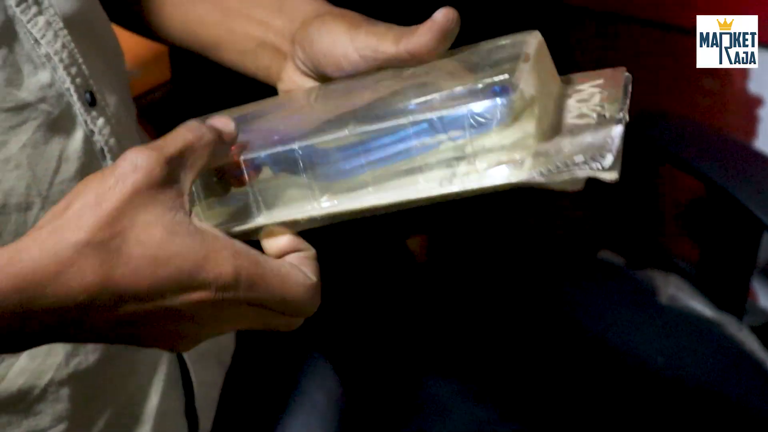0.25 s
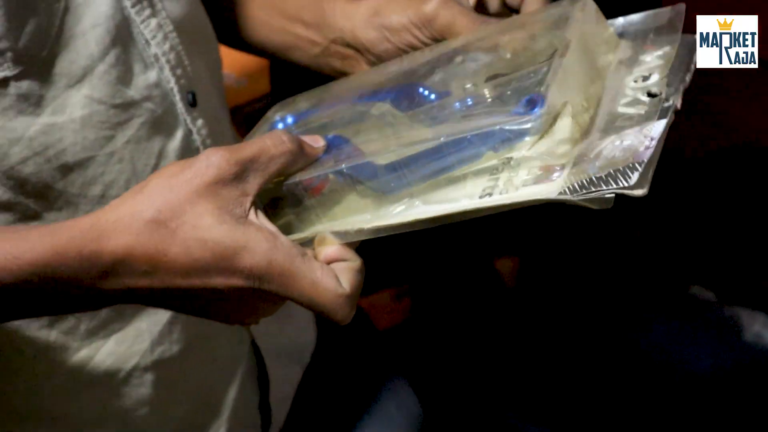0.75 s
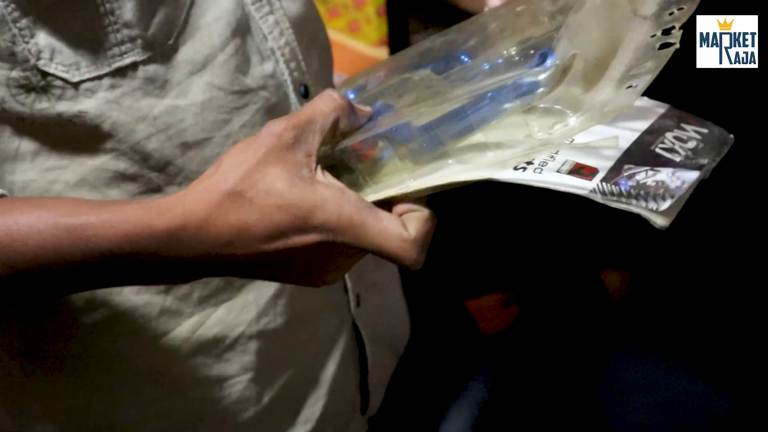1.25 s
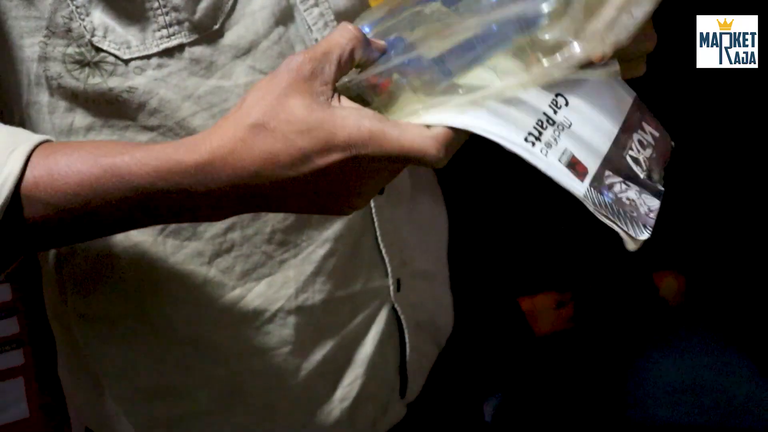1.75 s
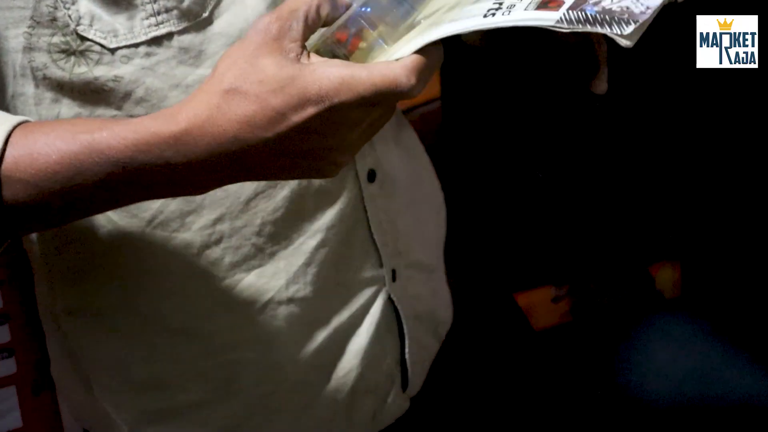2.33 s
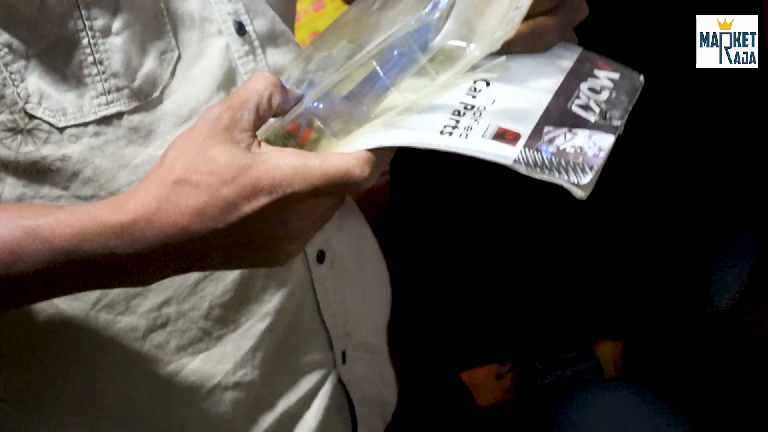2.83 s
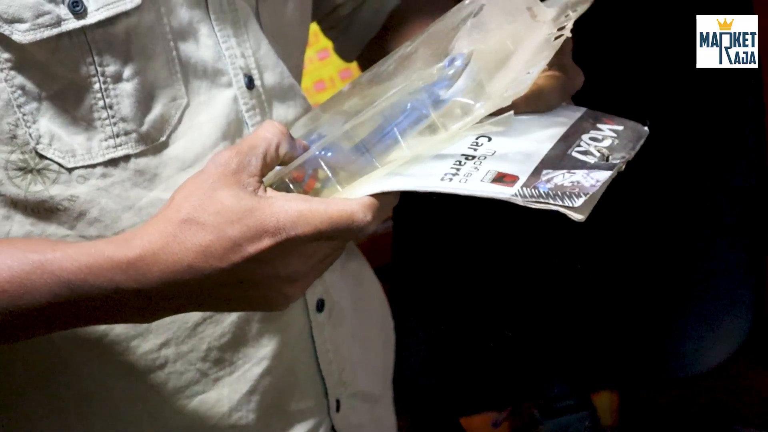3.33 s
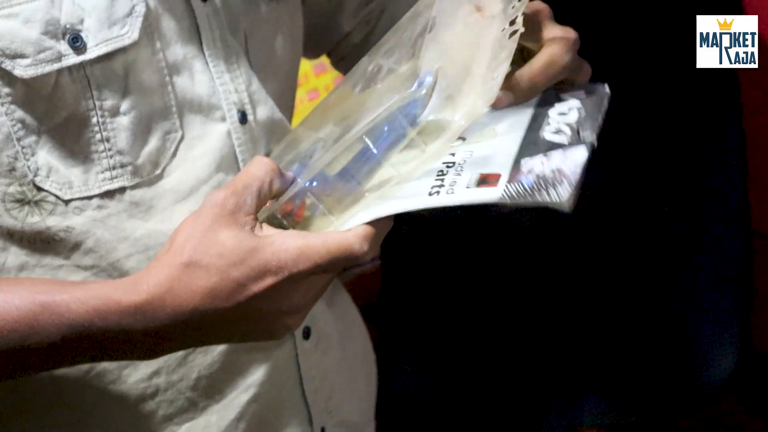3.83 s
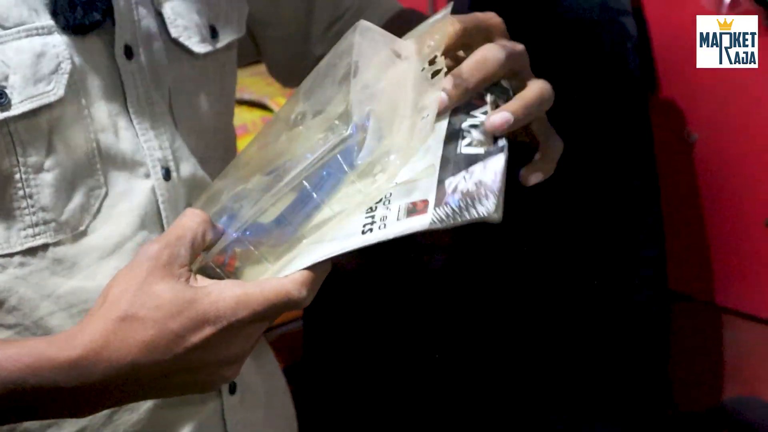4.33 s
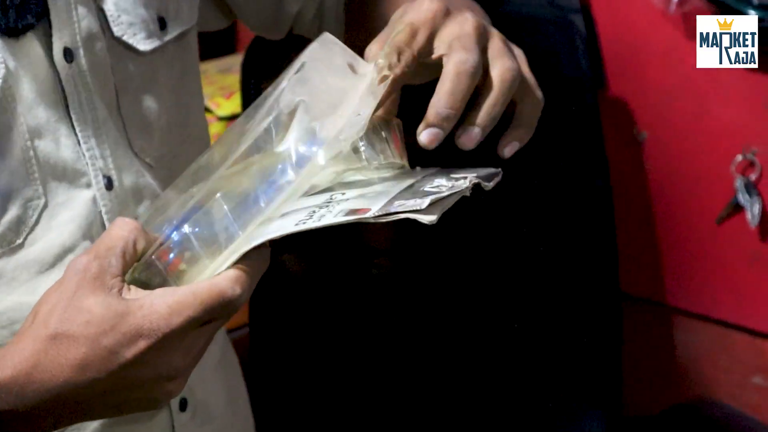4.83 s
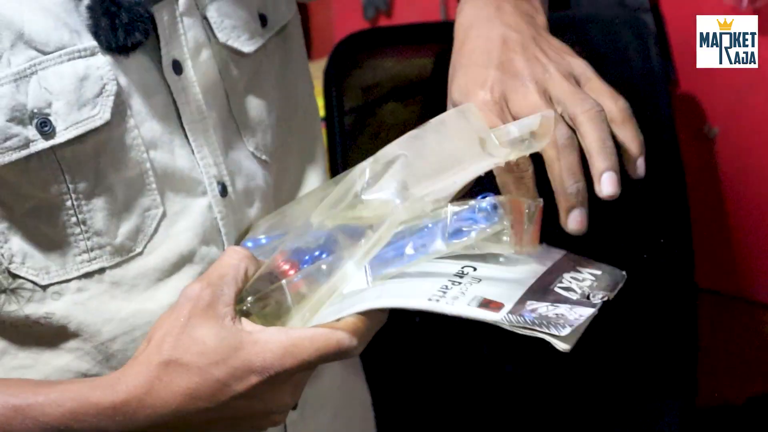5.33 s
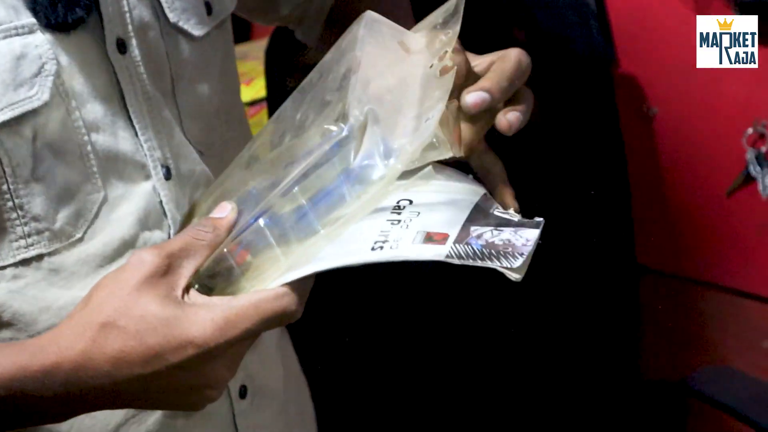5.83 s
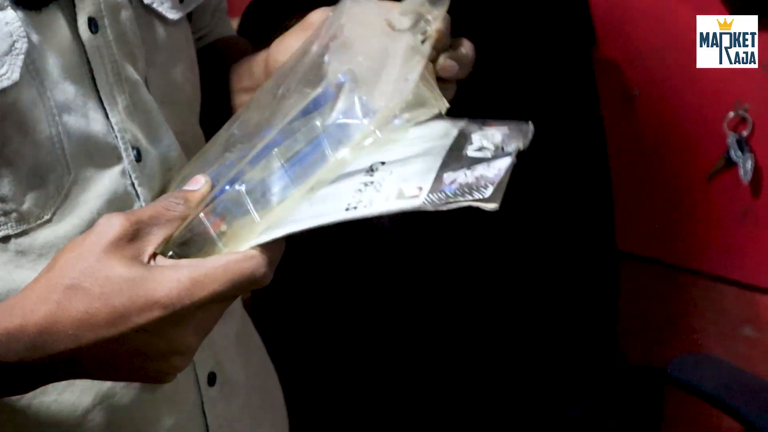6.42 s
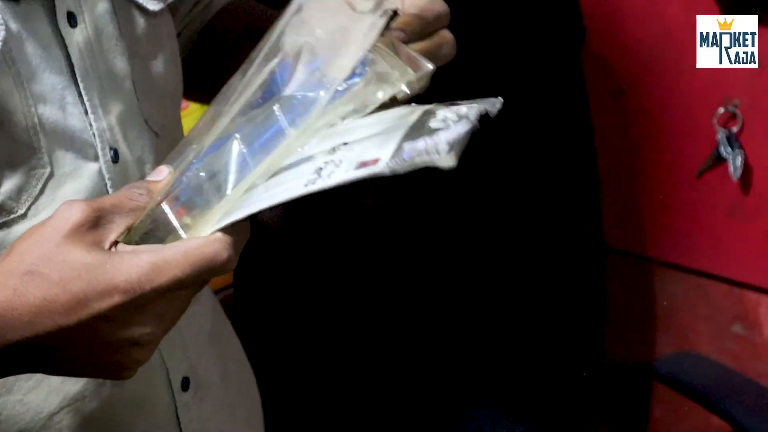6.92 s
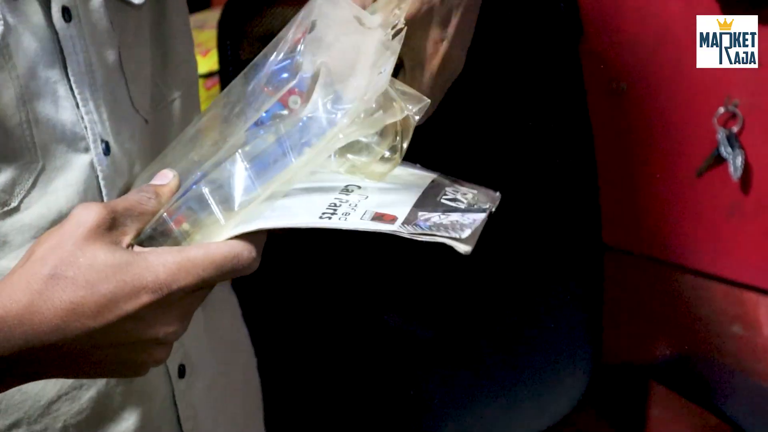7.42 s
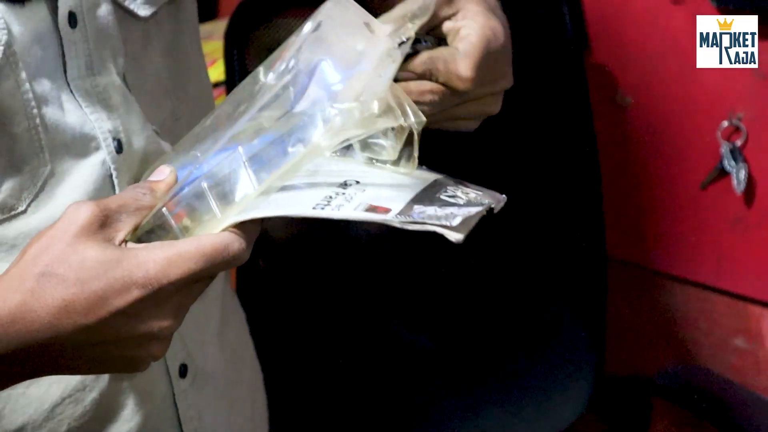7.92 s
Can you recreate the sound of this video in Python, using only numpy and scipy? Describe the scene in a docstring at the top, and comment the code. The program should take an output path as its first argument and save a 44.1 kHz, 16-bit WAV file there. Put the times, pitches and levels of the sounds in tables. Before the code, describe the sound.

A thin, rigid plastic shell is bent and pried open by hand. Creases crack one after another, some bright and tiny, some hollow mid-pitched pops, mixed with short fizzy rubs. Soft low flops of the whole pack mostly accompany the first half. The microphone is near, in a small furnished shop with short reflections and a faint low steady air sound; the crackling stops and starts irregularly to the end.

```python
"""Sharp plastic cracks, short rubbing strokes and hollow thumps, close up, over the faint air of a small shop.
Hands bend and pry open a stiff clear plastic pack on a card backing; creases snap through one by one.
Each snap mixes filtered noise bursts for crack, ringing patch and pushed air, plus a decaying sine for the patch.
Rubbing is random slips through resonances; flops of the whole shell are low sines that sag in pitch.
Close walls and shelves answer with a short echo of sparse random reflections."""
import sys
import numpy as np
from scipy import signal
from scipy.io import wavfile

SR = 44100
rng = np.random.default_rng(int(sys.argv[2]) if len(sys.argv) > 2 else 0)


def master(y):
    """Save y as 16-bit WAV."""
    cut = np.clip(np.atleast_2d(y).T, -1, 1)
    pcm = np.round(cut * 32767)  # scale
    wavfile.write(sys.argv[1], SR, pcm.astype(np.int16))


N = 359900

# creases that stand out, levels before the layer trims, settling before each layer's stretch:
# t/s, patch level/dB, patch pitch f/Hz, crack relative to patch/dB, crack tilt/(dB per octave), settling/s
CREASE_SNAPS = [(0.0653, -38, 920, -12.5, 3, 0.0059), (0.2535, -35, 1520, -5, 4, 0.0043),
                (0.2758, -33.5, 1960, -4.5, 1.5, 0.0016), (.316, -40, 1800, -8.5, 5, 0.0042),
                (0.426, -49, 1700, -18, -3, 0.0012), (0.479, -32.5, 990, -4, -8.5, 0.0095),
                (0.494, -28, 410, -13.5, 4, 0.0037), (.5602, -37.5, 776, -23, -1, 0.0063),
                (0.6202, -35, 686, -13, 2, 0.0041), (0.6554, -35.5, 2380, -10, 1.5, 0.0046),
                (0.7268, -39.5, 1190, -29, -4, 0.0061), (0.8011, -30, 1830, -2.5, 0, 0.0023),
                (0.8213, -23, 676, -12.5, 4, 0.0054), (.8642, -11.5, 810, -21, 2, 0.0027),
                (1.0795, -32.5, 432, -7.5, 2.5, 0.019), (1.2931, -26.5, 1143, -9.5, 3.5, 0.025),
                (1.3377, -14.5, 1250, -2.5, 4, 0.0026), (1.4366, -27.5, 1870, -5, 4.5, 0.0033),
                (1.470, -25.5, 1206, -4.5, 4.5, 0.01), (1.5153, -13, 870, -10.5, 3.5, 0.0017),
                (1.5279, -25, 945, 3, 1, 0.0059), (1.5469, -23, 2290, -2.5, -0.5, 0.0036),
                (1.6678, -32, 970, -6.5, 0.5, 0.0036), (1.7071, -26.5, 580, -19, 2, 0.009),
                (1.7314, -14.5, 960, -1, -.5, 0.0037), (1.912, -44, 1520, 0, 2, 0.0022),
                (1.976, -43.5, 1040, -5, 2.5, 0.0092), (2.0204, -32.5, 1840, -5, 0, 0.003),
                (2.032, -24, 1415, -15.5, -2, 0.0086), (2.1238, -18, 890, -6, -3, 0.002),
                (2.1368, -35, 920, 2.5, 3.5, 0.0043), (2.1538, -21.5, 910, -18, 9, 0.0025),
                (2.182, -32, 2480, 0, 3.5, .002), (2.2526, -31, 910, -6.5, 1.5, .0065),
                (2.2938, -24, 1370, -7, 2.5, 0.0041), (2.3139, -17, 610, -11, -2, 0.0028),
                (2.326, -21.5, 1730, -4.5, 0.5, 0.02), (2.3371, -14.5, 940, -7.5, 0.5, 0.0055),
                (2.398, -27, 880, -16, -12, 0.0048), (2.4547, -26, 873, -14.5, 1.5, 0.012),
                (2.58, -24, 886, -13.5, 1, 0.0021), (2.728, -31.5, 980, -16, -6, 0.0038),
                (2.7431, -27, 1160, -8, -16, 0.011), (2.76, -22, 990, -2.5, 2, 0.0038),
                (2.8022, -34, 540, -26, -2, .003), (2.821, -21.5, 940, -17.5, 2.5, 0.0025),
                (2.8478, -24, 1362, -5, -2.5, 0.0088), (2.8594, -22, 1700, -5.5, 0, 0.0017),
                (2.9107, -27, 580, -4, 4.5, 0.015), (2.9528, -26, 387, -10.5, -1, 0.0028),
                (3.0026, -19.5, 1690, -8.5, 1, 0.0023), (3.025, -26.5, 915, -16, 1, 0.003),
                (3.0993, -31.5, 397, -18, 5, 0.0043), (3.1521, -20.5, 1060, -7, 4, 0.0014),
                (3.1924, -37.5, 2350, 3, -3.5, 0.0016), (3.2334, -16.5, 1494, -2.5, 0, 0.005),
                (3.2442, -14.5, 2330, 2, 2.5, 0.0013), (3.4945, -35, 950, -15, -0.5, 0.0054),
                (3.7354, -25, 2420, 0.5, 6.5, 0.00089), (3.7703, -26, 650, -35, 0, 0.0024),
                (3.7875, -26.5, 2800, -1.5, -5, .0041), (3.798, -21, 447, -12, 2, 0.0029),
                (3.8325, -33, 2500, 2.5, -9, 0.0024), (3.872, -30, 650, -24, 0, 0.0022),
                (3.883, -29, 1400, -25, -12, 0.0012), (3.8927, -22, 1600, -4, 1, 0.0015),
                (3.909, -23, 328, -2.5, 3, 0.0057), (3.9481, -25, 1320, -1, -2, 0.0041),
                (3.955, -15.5, 340, -4.5, 1.5, 0.0034), (4.0185, -16, 2640, -3.5, -1, 0.0089),
                (4.1717, -36, 500, -21, 3, 0.006), (4.216, -29.5, 860, -13.5, 4, 0.0054),
                (4.2882, -30.5, 900, -18, -0.5, 0.005), (4.303, -31, 1440, -15, -15, 0.0021),
                (4.4088, -28, 910, -9.5, 1.5, .02), (4.433, -29, 1640, -4.5, -0.5, 0.003),
                (4.5388, -29.5, 1610, -10, -1.5, 0.0026), (4.6207, -20.5, 1440, -2.5, -4.5, 0.00089),
                (4.637, -24, 870, -5.5, -3, 0.0043), (4.6781, -33, 2120, -6.5, 1, 0.0062),
                (4.7552, -24, 690, -11, 3.5, .003), (4.7906, -19.5, 877, -9.5, -1, 0.014),
                (4.815, -23, 875, -2.5, 0.5, 0.002), (4.8301, -13, 870, -3.5, 1, 0.0022),
                (4.9806, -38.5, 980, -25, 6, .004), (5.0255, -33, 560, -26, 0, 0.0077),
                (5.0481, -30.5, 900, -14, 4, 0.0027), (5.0683, -31.5, 915, -12, 4, 0.0026),
                (5.2117, -25, 970, 2.5, 0, 0.00079), (5.2216, -21, 2610, 1.5, -1, 0.0022),
                (5.246, -21, 950, -24, -4, 0.0035), (5.2668, -14, 470, -7, -1, 0.0014),
                (5.3559, -19, 2580, -3, 4, 0.0037), (5.3967, -29, 930, -5, -2, .003),
                (5.4071, -29.5, 940, -2, 3, 0.0031), (5.531, -37, 1680, 2.5, 2.5, 0.012),
                (5.567, -24, 1700, -3.5, 3.5, 0.0021), (5.6086, -29.5, 2350, 6, -3, 0.0011),
                (5.6145, -32, 2460, 6.5, -2, 0.0044), (5.6398, -23, 1030, -17, -8, 0.0032),
                (5.6845, -21.5, 940, -7.5, 1.5, 0.0018), (5.7128, -13, 780, -13, 0, 0.0022),
                (5.8713, -24.5, 1690, -12.5, -11, .001), (5.904, -35, 2800, -7, 2, 0.0027),
                (6.003, -37, 910, -3, -12, 0.0017), (6.0291, -30, 1100, -2, -3.5, 0.0015),
                (6.051, -41, 1910, -1, -12, 0.0017), (6.0955, -25.5, 1800, -8, 2, 0.0026),
                (6.111, -29.5, 2500, 10, 2, 0.0013), (6.123, -18, 560, -17, 4, 0.002),
                (6.1398, -23.5, 1210, -13, -2, 0.0012), (6.2034, -38.5, 1290, -8, -12, .0011),
                (6.22, -38.5, 2960, 10.5, 2.5, .0022), (6.2746, -32, 1300, 1, 3, 0.0015),
                (6.2813, -13.5, 1020, -10.5, -5.5, .0018), (6.3211, -24, 1810, 0.5, -4.5, 0.0012),
                (6.3345, -23, 880, -11, -0.5, 0.0073), (6.372, -29.5, 830, -4, 4.5, 0.0033),
                (6.53, -43.5, 1800, -5.5, 3.5, 0.0043), (6.622, -24, 2030, -13.5, -2.5, 0.0017),
                (6.7496, -32.5, 1630, -6, 0.5, 0.007), (6.7734, -18.5, 420, -14, -9, 0.0018),
                (6.824, -26, 1600, -3.5, -4.5, .006), (7.0302, -16, 1570, -4, 2.5, 0.0032),
                (7.095, -38.5, 700, -18, -4, 0.01), (7.1363, -25.5, 2110, -9, -7, 0.0011),
                (7.149, -24.5, 1420, -2, -4.5, .0018), (7.1677, -25, 590, -3, 0.5, 0.0022),
                (7.1777, -16.5, 1020, -11.5, -2, 0.0029), (7.2101, -29, 970, 3, 0.5, 0.00053),
                (7.2477, -26.5, 1650, -3.5, 1.5, 0.011), (7.3087, -20, 2500, 1, 0.5, 0.0016),
                (7.339, -29.5, 1390, -6, -3, 0.002), (7.3474, -26, 2630, 0, 3, 0.0034),
                (7.417, -34, 437, -19, -3, 0.0025), (7.4412, -20.5, 1790, -6, -1, 0.0049),
                (7.4612, -23, 805, -1, -3, 0.021), (7.4865, -19, 830, -6, 2.5, .0035),
                (7.506, -24.5, 1300, -1.5, 0, 0.0063), (7.533, -27.5, 1220, -10, -13, 0.0011),
                (7.6226, -32, 1000, -7, -3, 0.0037), (7.635, -34, 1186, 7.5, -1, 0.0036),
                (7.747, -36, 1760, -1, -4, 0.059), (7.7806, -27, 1880, -2.5, 0.5, 0.0011),
                (7.813, -21.5, 3030, 5, -4.5, 0.00057), (7.936, -35, 420, -32, 5, .002),
                (8.0301, -31, 2070, -13, -14, 0.0015), (8.1149, -30, 1600, -.5, 0, 0.0027),
                (8.1261, -26.5, 1140, -10, 2, 0.0033)]
USUAL_HZ = 1010  # patch pitch of a usual crease


def gain_of(db):
    """Decibels to amplitude."""
    return 10 ** (np.asarray(db) / 20)


def evened(x):
    """Scales to an rms of one."""
    return x / np.sqrt(np.mean(x ** 2) + 1e-20)


def read(points, hz):
    """Reads a table on a log-frequency axis."""
    f, value = np.transpose(points)
    return np.interp(np.log(hz + 1), np.log(f + 1), value)


def add(mix, s, sound):
    """Mixes a sound in at a time in seconds."""
    part = mix[max(round(s * SR), 0):][:len(sound)]
    part += sound[:len(part)]


def colour(x, points, ring_hz=1000, ring_db=0, octaves=0.25, tilt_db=0, size=2048):
    """Causal filter with the given spectrum, an optional resonance and a tilt of the treble."""
    hz = abs(np.fft.fftfreq(size, 1 / SR))
    db = read(points, hz)
    db += ring_db / (1 + (np.log2((hz + 1) / ring_hz) / octaves) ** 2)
    db += tilt_db * np.log2(np.clip(hz, 2500, 11000))
    # minimum phase: nothing sounds ahead of the input
    spectrum = np.exp(np.conj(signal.hilbert(np.log(gain_of(db)))))
    taps = np.fft.ifft(spectrum).real
    return signal.fftconvolve(x, taps)[:len(x)]


def blow(x, db):
    """Gives a short sound the energy that this level holds over a hundredth of a second."""
    return gain_of(db) * x * np.sqrt(SR / 100 / (np.sum(x ** 2) + 1e-20))


def shop(level_db=-53):
    """Faint steady air of the shop, as coloured noise."""
    # air spectrum: f/Hz, relative level/dB
    shop_colour = [(25, -7), (55, 6), (110, -1), (200, -3), (400, 0), (850, -25), (2500, -29),
                   (7000, -31.5), (13000, -39.5), (16000, -71)]
    return gain_of(level_db) * evened(colour(rng.standard_normal(N), shop_colour))


def room(x, gap=0.004, size=8192):
    """Close walls and shelves answer within milliseconds; fresh random reflections per short grain."""
    # echo decay: f/Hz, t60/s
    echo_decay = [(100, 0.19), (300, 0.072), (900, 0.078), (2500, 0.089), (6000, 0.12), (14000, 0.12)]
    out, length = np.zeros(N), SR // 3
    # overlapping grains with new reflections each, so no fixed colour builds up
    for start in range(0, N, size // 2):
        taps = rng.standard_normal(length) * (rng.random(length) < 4000 / SR)
        taps = taps * (np.arange(length) > gap * SR)
        hz, t, z = signal.stft(taps, SR, nperseg=256)
        decay = gain_of(-60 * t / read(echo_decay, hz)[:, None])
        tail = signal.istft(z * decay, SR)[1]
        part = x[start:start + size]
        grain = part * np.hanning(size)[:len(part)]
        add(out, start / SR, signal.fftconvolve(grain, tail / np.linalg.norm(tail)))
    return out


def rubbing():
    """Strength of rub and fizz: each stroke swells and fades in an arch, and each snap jolts the sheets."""
    # strokes of the sheets sliding under the fingers, fizz before the layer trim:
    # start t/s, length/s, level/dB, edge fizz relative to the rub/dB
    strokes = [(0.17, 0.31, -47, 5.5), (.5, .2, -46.5, 2.5), (0.714, 0.39, -45, -0.5),
               (1.034, 0.18, -39, 0.5), (1.211, 0.17, -36, 0.5), (1.372, 0.25, -29, 1.5),
               (2.174, 0.35, -37.5, -3.5), (2.593, 0.13, -47.5, -15), (2.73, .36, -36, 2),
               (3.344, 0.062, -45, 6.5), (3.66, 0.49, -43.5, 2), (4.3, 0.47, -36, -2.5),
               (4.742, 0.19, -38, 9), (4.95, 0.17, -37, 1.5), (5.12, 0.25, -43, 1.5),
               (5.498, 0.25, -31.5, 3.5), (5.95, 0.22, -43.5, 0), (6.242, 0.19, -36.5, -13),
               (6.437, 0.45, -45, 2.5), (6.67, 0.16, -52.5, -7), (7.14, 0.26, -35, 4),
               (7.42, 0.14, -38.5, 7.5), (7.64, 0.42, -43, -1.5), (8.082, 0.15, -46.5, 7)]
    peak, roundness = 0.35, 0.56  # share of a stroke at its fastest; how pointed its arch is
    grip_db = -54.5  # the held sheets never lie quite still
    shift_db, shift_s = -27, 0.065  # shift relative to the snap's listed level; decay time constant
    rub, fizz, t = np.zeros(N), np.zeros(N), np.arange(SR // 2) / SR
    for start, length, db, fizz_db in strokes:
        speed = np.sin(np.pi / 2 * np.interp(t / length, [0, peak, 1], [0, 1, 0]))
        stroke = gain_of(db) * speed ** roundness
        add(rub, start, stroke ** 2)
        add(fizz, start, (gain_of(fizz_db) * stroke) ** 2)
    shift = np.full(N, gain_of(grip_db) ** 2)
    for s, db, *_ in CREASE_SNAPS:
        add(shift, s, (gain_of(db + shift_db) * np.exp(-t / shift_s)) ** 2)
    return np.sqrt(rub + shift), np.sqrt(fizz + shift)


def slips(per_s, spread_db, smooth, settle):
    """Tiny stick-slip releases of uneven size, each a short shiver, over a smooth hiss."""
    chance, size = rng.random(N), np.minimum(rng.exponential(1, N), 3)
    releases = (chance < per_s / SR) * gain_of(spread_db * size) ** 2
    power = signal.lfilter([1], [1, -np.exp(-1 / (settle * SR))], releases)
    return np.sqrt(power / power.mean() + smooth ** 2) * rng.standard_normal(N)


def sliding(level_db=0, fizz_db=-9, count=8):
    """Slips ring patches of many sizes as the sheets rub; their sharp edges fizz."""
    # spectra of the rubbed sheets and of their edges: f/Hz, relative level/dB
    rub_colour = [(40, -8), (150, 2), (450, -1.5), (950, -1), (1600, -8.5), (2400, -10.5), (4000, -32)]
    fizz_colour = [(1200, -28), (2100, 2), (2700, 8), (4000, -1.5), (7000, -8), (10000, -16), (14000, -16),
                   (16000, -51)]
    body, edges = np.zeros(N), np.zeros(N)
    for hz in np.geomspace(450, 2200, count):
        ticks = slips(per_s=45, spread_db=5.5, smooth=0.44, settle=0.0014)
        body += colour(ticks, rub_colour, ring_hz=hz, ring_db=14.0, octaves=0.14)
        edges += colour(ticks, fizz_colour, ring_hz=2.8 * hz, ring_db=11)
    rub, fizz = rubbing()
    return gain_of(level_db) * (rub * evened(body) + gain_of(fizz_db) * fizz * evened(edges))


def flops(level_db=-1, t60=0.088, rise=0.00083):
    """The lowest mode of the shell, sagging as it relaxes and damped by the hands."""
    # whole-shell flops: t/s, level before trim, rise and decay/dB, relaxed pitch f/Hz
    flop_events = [(.621, -28.5, 173), (0.867, -19, 194), (1.08, -28, 157), (1.263, -24, 160),
                   (1.336, -20, 244), (1.732, -16, 167), (2.034, -19.5, 173), (2.335, -23, 202),
                   (2.455, -16, 133), (2.757, -15.5, 166), (3.952, -20, 267), (5.712, -26, 107)]
    sag, sag_s = 0.22, 0.0064  # the bent shell starts stiffer: extra share of pitch; time to relax
    out, t = np.zeros(N), np.arange(SR // 4) / SR
    stretched = t + sag * sag_s * (1 - np.exp(-t / sag_s))
    for s, db, hz in flop_events:
        envelope = gain_of(db + level_db - 60 * t / t60) * (1 - np.exp(-t / rise))
        add(out, s, envelope * np.sin(2 * np.pi * hz * stretched))
    return out


def shiver(t, settle, kick):
    """A first jolt, then bending waves that bounce about the sheet and die, as decaying noise."""
    waves = rng.standard_normal(len(t)) * np.exp(-t / settle)
    waves /= np.linalg.norm(waves)
    waves[0] += kick * rng.choice([-1, 1])
    return waves


def crumple(t, lead, share, decay):
    """The crease creaks a few times just before it gives, and its neighbours tick as it settles."""
    chance, size = rng.random(len(t)), rng.standard_normal(len(t))
    ticks = (chance < 500 / SR) * size * np.exp(np.where(t < 0, t / lead, -t / decay))
    return share * ticks


def lesser_creases(count=200):
    """Small snaps at random moments, as strong as the rubbing that frees them."""
    per_s, relative_db, spread_db = 14, 0.5, 4  # mean rate; level relative to the rub, before trims
    low_hz, high_hz = 794, 2340
    crack_db, tilt_db, settle_s = -11.5, 1, 0.00086  # crack before trim; tilt per octave; unstretched
    level_db, rows = 20 * np.log10(rubbing()[0]), []
    for chance, when, size, pitch in rng.random((count, 4)):
        if chance < per_s * N / SR / count:
            db = level_db[int(when * N)] + relative_db + spread_db * (2 * size - 1)
            hz = low_hz * (high_hz / low_hz) ** pitch
            rows.append((when * N / SR, db, hz, crack_db, tilt_db, settle_s))
    return rows


def radiated(hz):
    """Colour of the shell around a patch: a small patch radiates poorly below its pitch."""
    # shell spectrum: f/Hz, relative level/dB
    shell_colour = [(150, -23), (280, -8.5), (380, 1), (560, 4.5), (700, 0), (880, 3), (1150, -1.5),
                    (1500, 0), (2300, -7.5), (2900, -15), (5000, -52.5)]
    small_hz, slope_db, most_octaves = 1530, -2, 1.65  # full loss from this pitch up; per octave; range
    small = np.clip(np.log2(hz / USUAL_HZ) / np.log2(small_hz / USUAL_HZ), 0, 1)
    return [(f, db + small * slope_db * np.clip(np.log2(hz / f), 0, most_octaves))
            for f, db in shell_colour]


def pushed(db, hz, settle):
    """Air level against the listed patch: a slow, gentle buckle of a large patch pushes more."""
    push_db, most_db = -10, -1  # for a usual crease; upper limit
    usual_db, usual_settle_s = -23.5, 0.0032
    slow_db, pitch_db, per_db = 4.5, -1.5, -0.02  # per doubling of settling; per octave; per dB of level
    push = push_db + slow_db * np.log2(settle / usual_settle_s)
    push += pitch_db * np.log2(hz / USUAL_HZ) + per_db * (db - usual_db)
    return min(push, most_db)


def snaps(patch_db=1.95, crack_db=1.49, tone_db=-5.5, push_slow=2.28, patch_slow=1.83, crack_slow=1.0,
          rise=0.00073, size=3584):
    """Each crease cracks at once; the patch around it and the air it pushes follow more slowly."""
    # spectra of the pushed air and of the crack: f/Hz, relative level/dB
    push_colour = [(25, -17.5), (70, -5), (160, -1), (290, 0), (400, -2), (800, -57)]
    crack_colour = [(1200, -35.5), (2100, 0), (2700, 5), (3800, 1.5), (5000, -4), (7000, -9.5),
                    (9000, -15.5), (12000, -23.5), (14500, -30), (16000, -52)]
    # a sharper crease cracks higher; every one differs a little
    usual_crease_hz, octaves_per_tilt, spread_octaves = 3860, 0.28, 0.32
    out, t = np.zeros(N), np.arange(size) / SR
    early = SR // 100  # samples of creaking ahead of the snap
    around = np.arange(-early, size) / SR
    swell = 1 - np.exp(-t / rise)

    def after_creaks(x):
        return np.pad(x, (early, 0))

    for s, db, hz, crack, tilt, settle in CREASE_SNAPS + lesser_creases():
        settle = max(settle, 1 / SR)
        ticks = crumple(around, lead=0.0037, share=0.079, decay=0.023)

        waves = after_creaks(shiver(t, settle * patch_slow, kick=0) * swell) + ticks
        ringing = colour(waves, radiated(hz), ring_hz=hz, ring_db=5.5, octaves=0.3)
        # the main mode of the patch
        tone = np.sin(2 * np.pi * hz * t) * np.exp(-t / (settle * 1.23)) * swell
        patch = blow(ringing, 0) + blow(after_creaks(tone), tone_db)

        air = colour(after_creaks(shiver(t, settle * push_slow, kick=0.32)), push_colour)

        fracture = after_creaks(shiver(t, settle * crack_slow, kick=0.22)) + ticks
        octaves_up = octaves_per_tilt * tilt + spread_octaves * rng.uniform(-1.15, 1)
        crease_hz = usual_crease_hz * 2 ** octaves_up
        edge = colour(fracture, crack_colour, ring_hz=crease_hz, ring_db=4.5, octaves=0.38, tilt_db=tilt)

        snap = blow(patch, db + patch_db)
        snap += blow(air, db + pushed(db, hz, settle))
        snap += blow(edge, db + crack + crack_db)
        add(out, s - early / SR, snap)
    return out


def scene(room_db=-8):
    """The pack, its echo and the quiet shop."""
    pack = snaps() + flops() + sliding()
    return (pack + gain_of(room_db) * room(pack) + shop())[None]


def record(dry, ceiling=0.78):
    """Rounds off the loudest peaks, then limits the band."""
    edge_hz = 15900
    held = dry / (1 + (dry / ceiling) ** 4) ** (1 / 4)
    lowpass = signal.firwin(255, edge_hz, window=("kaiser", 9), fs=SR)
    return signal.oaconvolve(held, lowpass[None], "same")


dry = scene()
out = record(dry)
master(out)
```